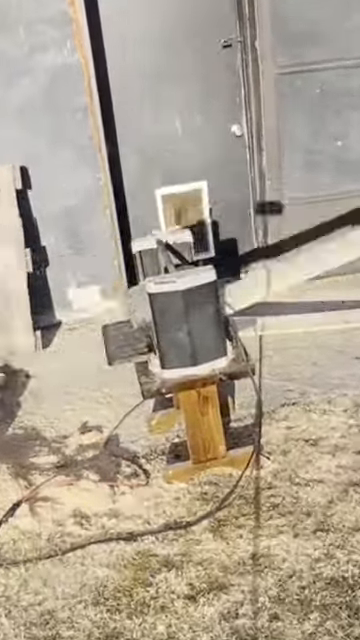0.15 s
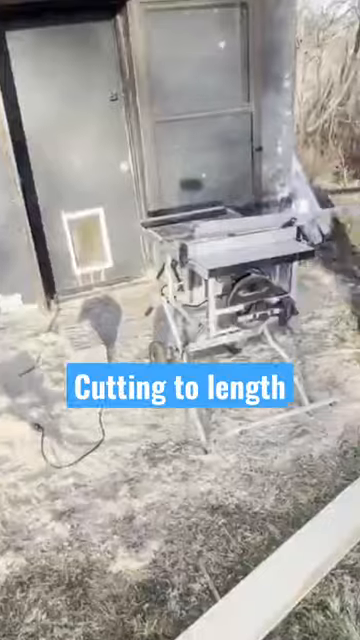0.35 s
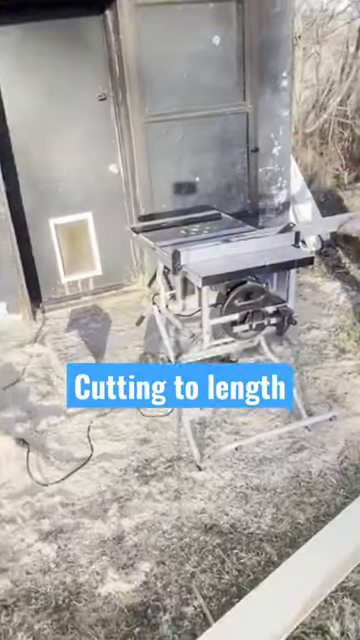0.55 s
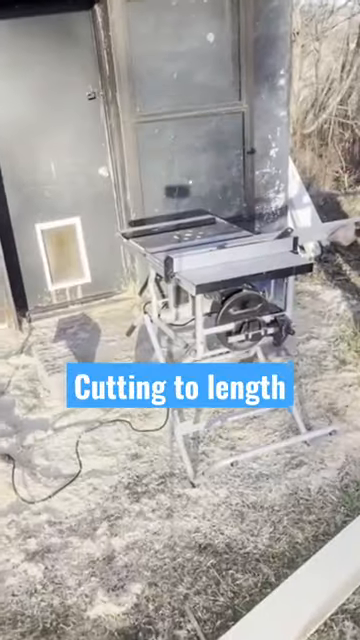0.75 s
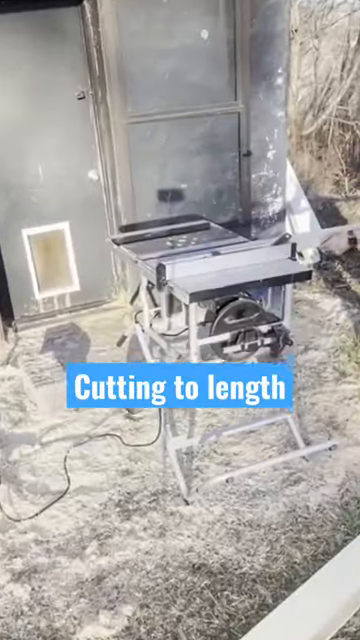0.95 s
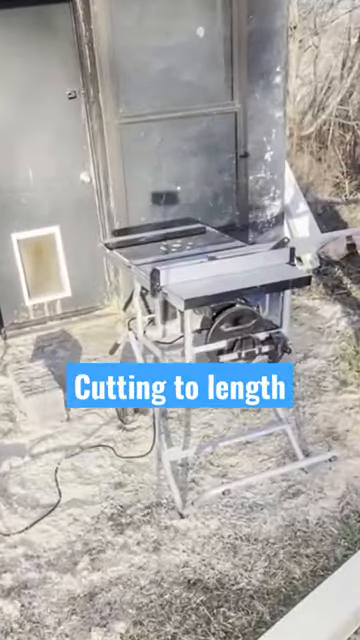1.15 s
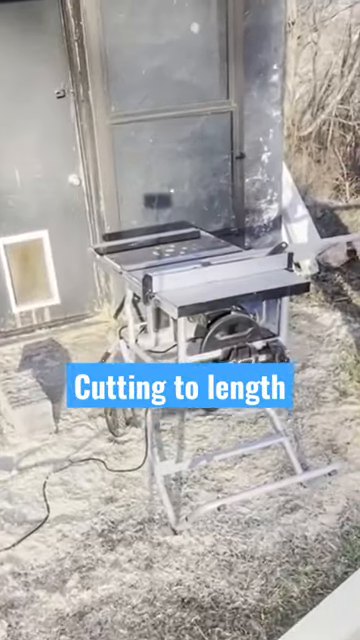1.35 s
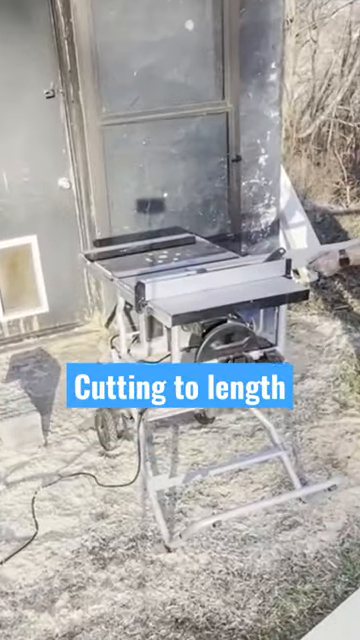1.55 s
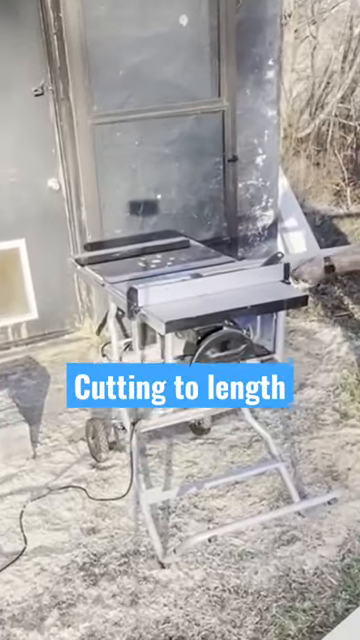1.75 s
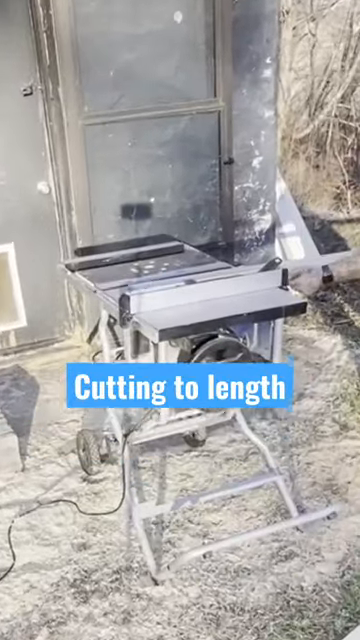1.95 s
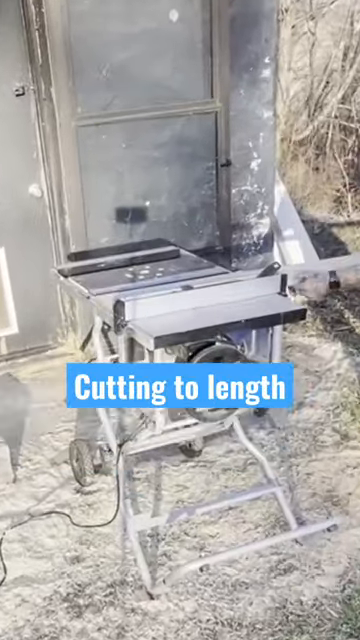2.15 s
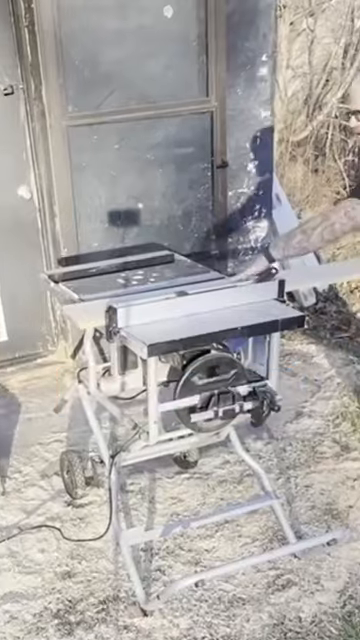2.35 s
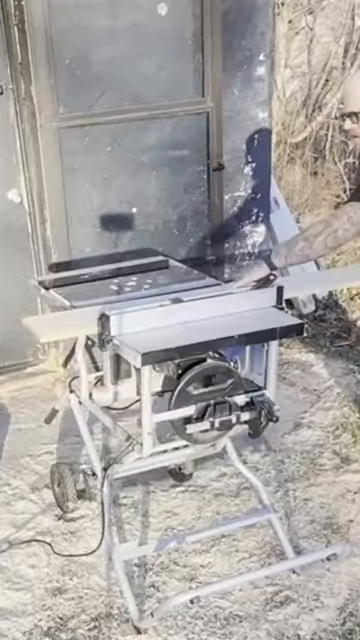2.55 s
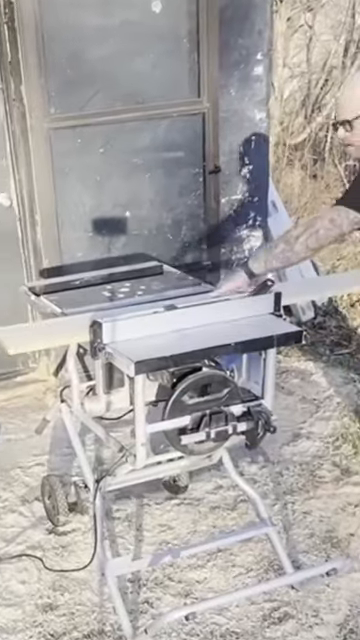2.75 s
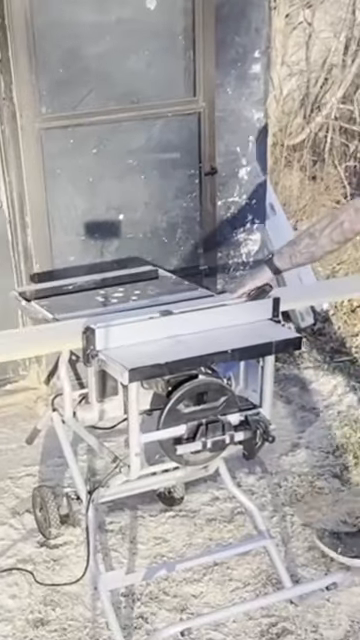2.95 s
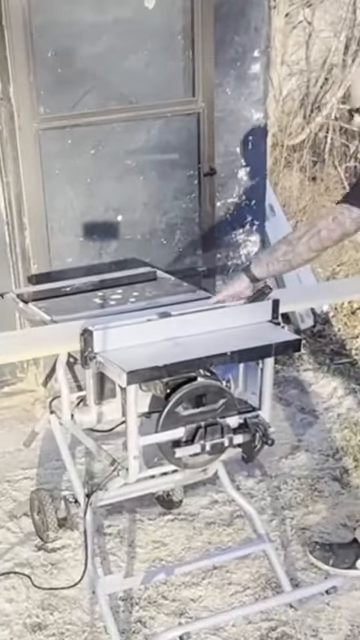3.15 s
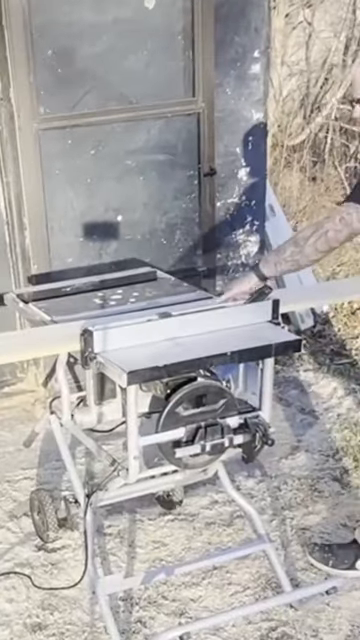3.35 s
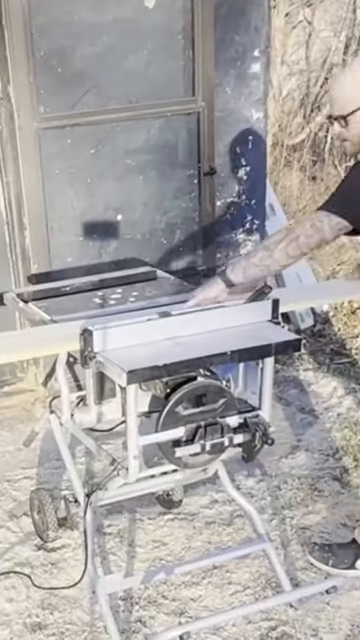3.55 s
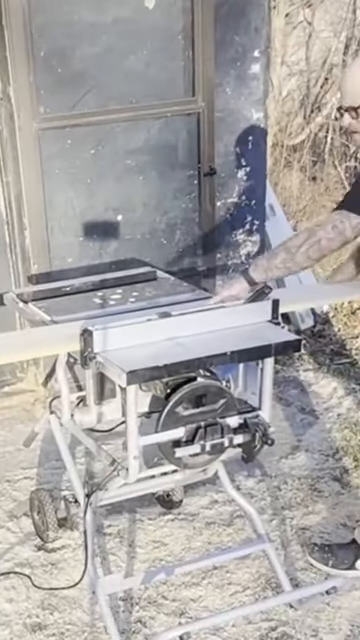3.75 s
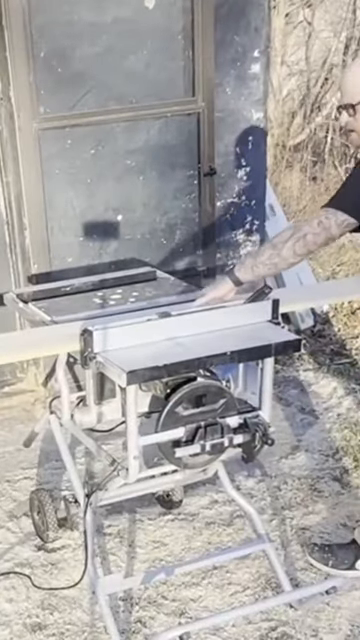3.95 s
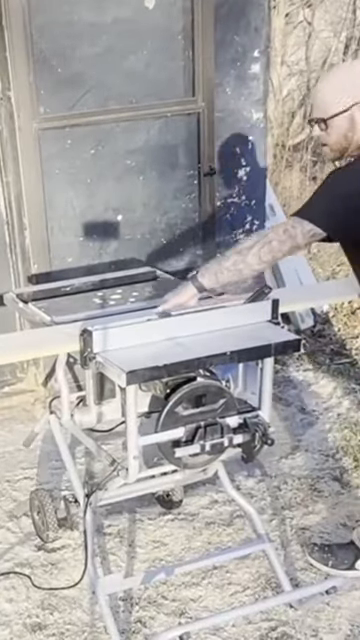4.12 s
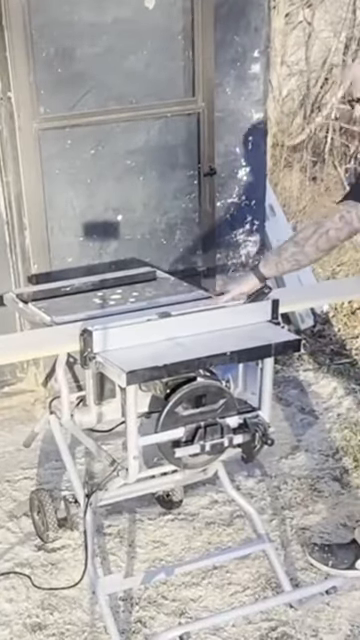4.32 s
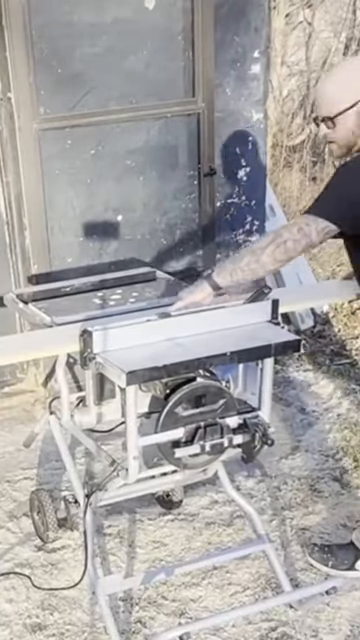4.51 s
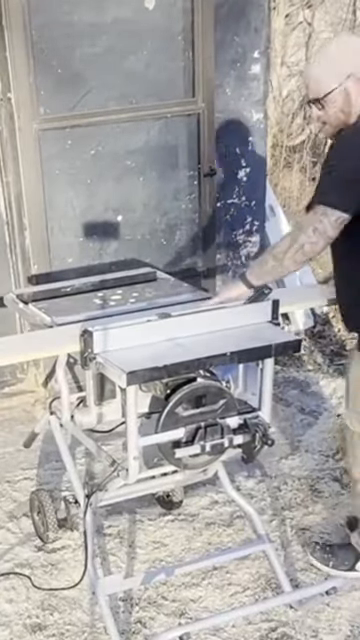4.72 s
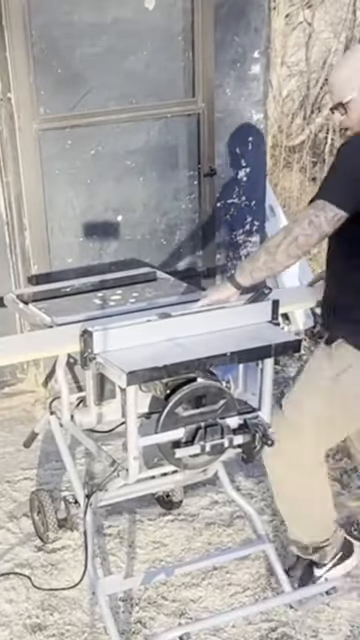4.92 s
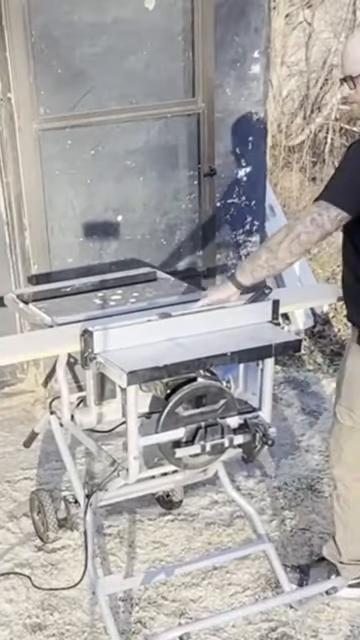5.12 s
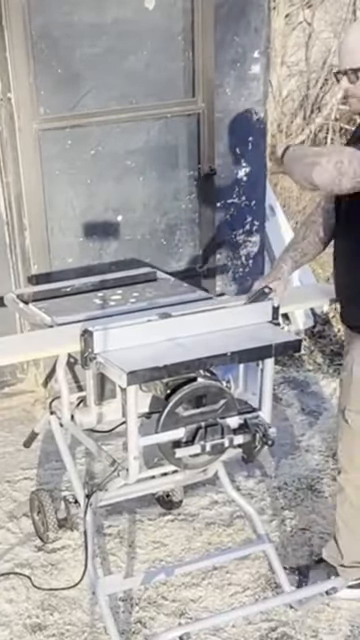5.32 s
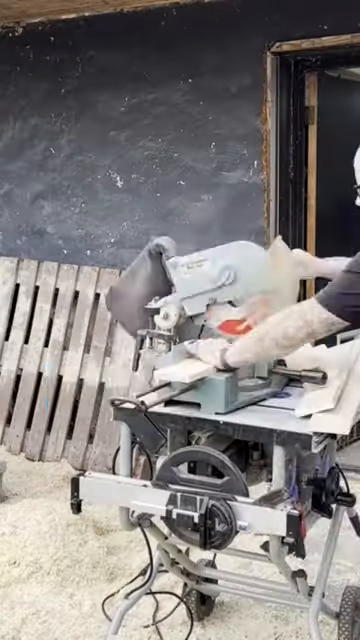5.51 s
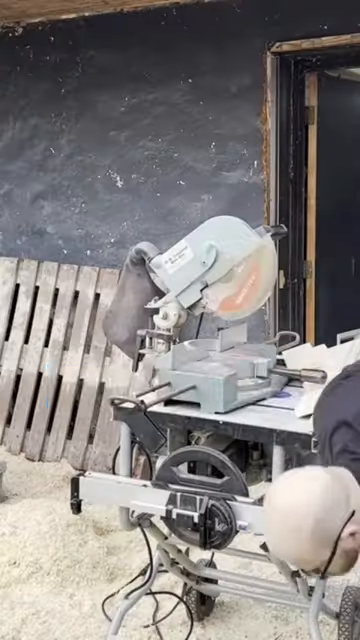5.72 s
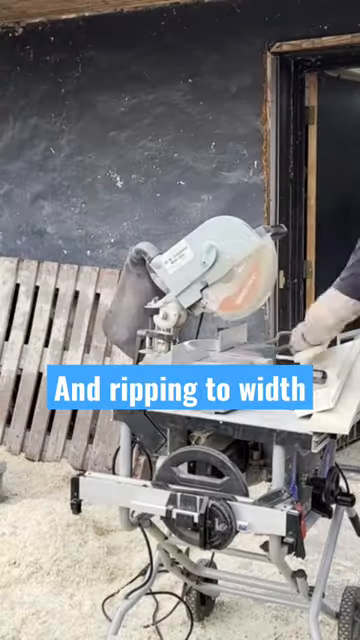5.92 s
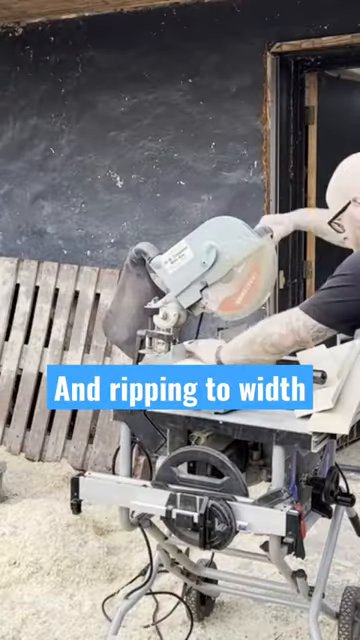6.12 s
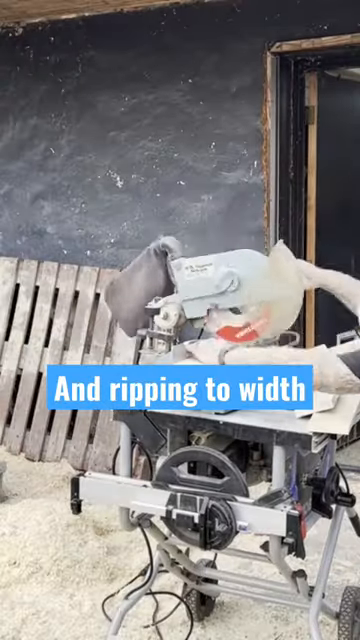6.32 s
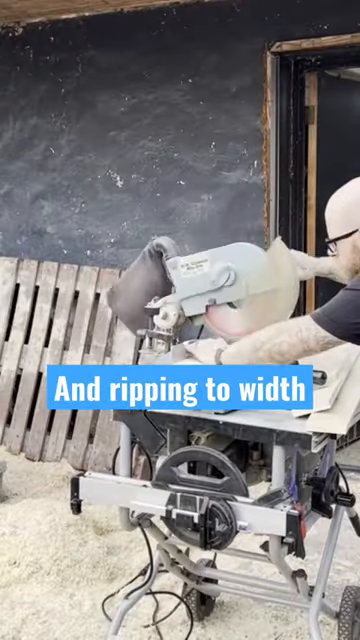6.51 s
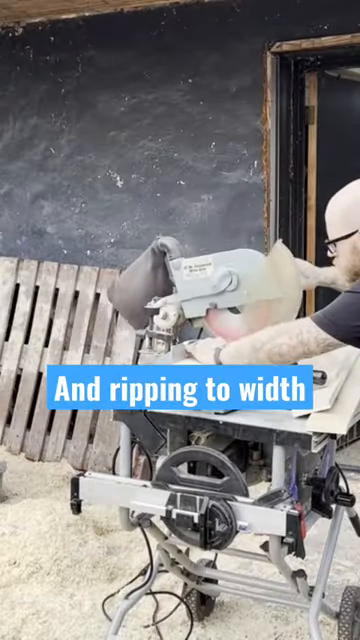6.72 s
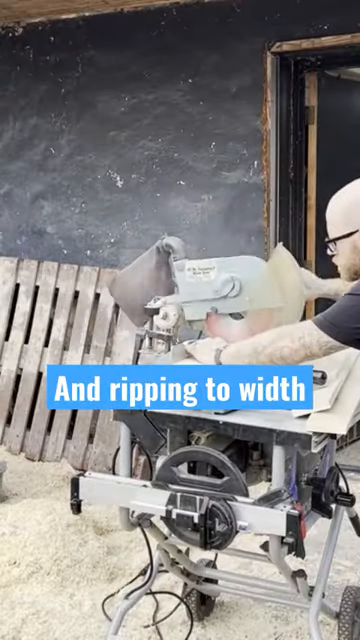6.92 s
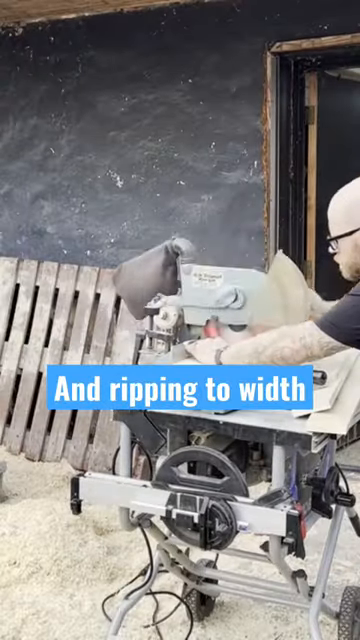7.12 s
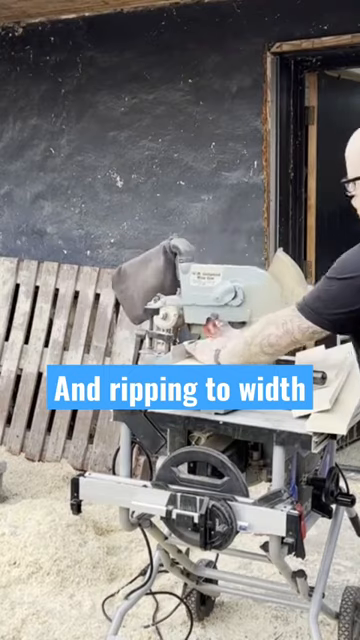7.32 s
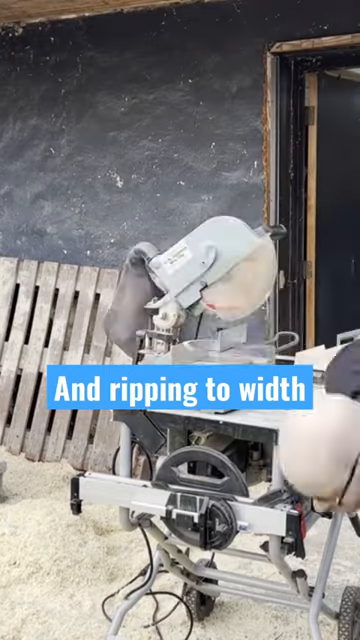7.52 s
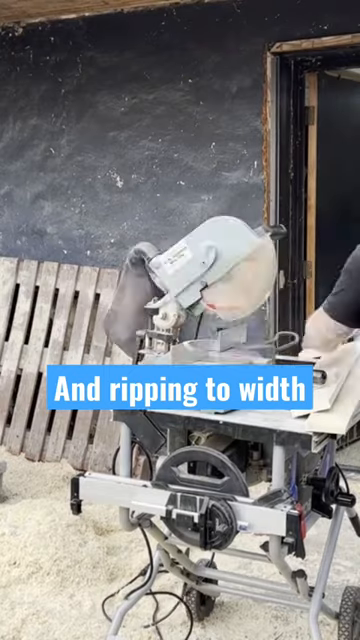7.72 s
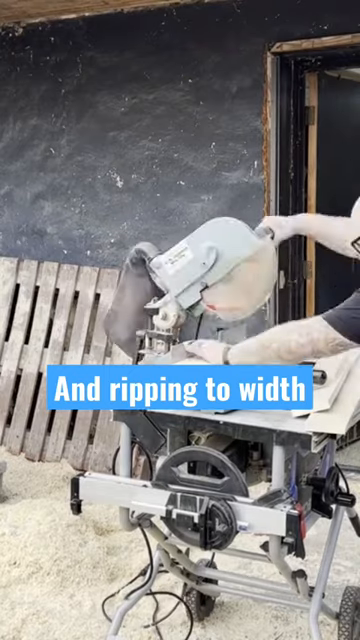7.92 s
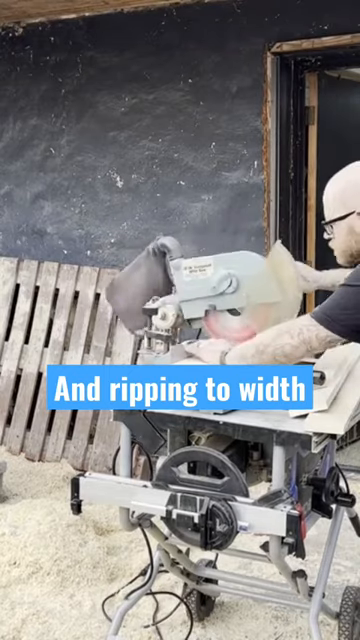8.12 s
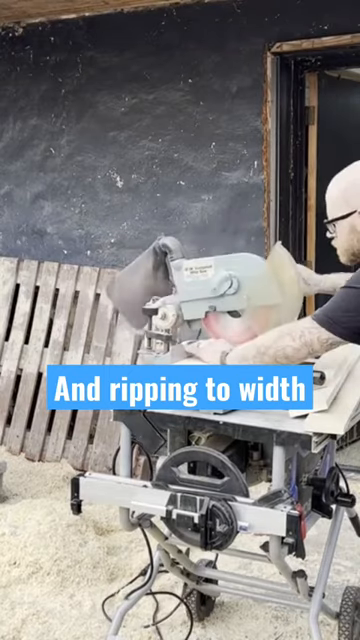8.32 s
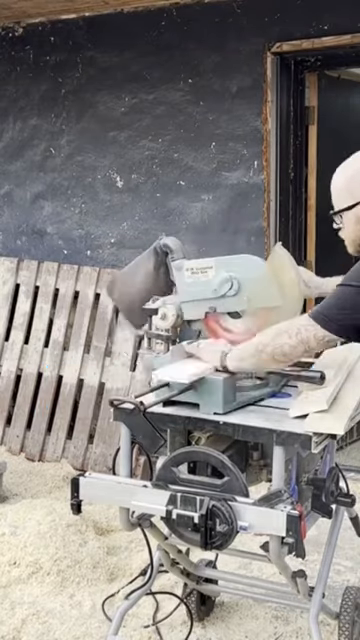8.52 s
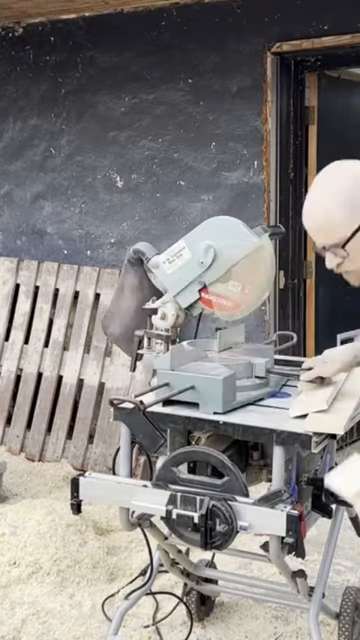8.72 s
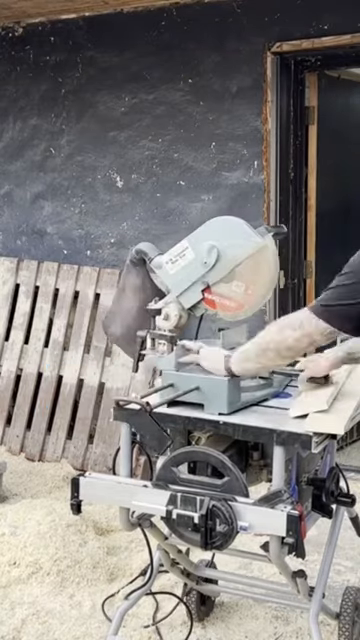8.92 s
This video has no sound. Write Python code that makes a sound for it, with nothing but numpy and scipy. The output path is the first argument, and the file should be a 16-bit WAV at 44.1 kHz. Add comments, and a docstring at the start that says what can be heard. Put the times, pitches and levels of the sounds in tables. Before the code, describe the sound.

A snippet of planer drone cuts to a table saw starting and whining unevenly through a long board, then two short miter saw cuts.

```python
"""Power tools in a windy yard

A planer, a table saw ripping a long board and two miter saw cuts follow abruptly. Motors are tones locked to
pitch curves that sag under load; fan air and cut wood are flickering noise bands; each saw starts with a surge
of harmonics. Wind is lumpy dull noise; knocks are noise bursts ringing board modes; squeaks and small birds
are short gliding tones. Two stereo settings, in the open and near a wall, place the sounds."""
import sys
import numpy as np
from scipy import signal
from scipy.fft import rfft, irfft, next_fast_len
from scipy.io import wavfile
from scipy.ndimage import uniform_filter1d

SR = 44100
rng = np.random.default_rng(int(sys.argv[2]) if len(sys.argv) > 2 else 0)


def int16_out(signal):
    """Quantize to a 16-bit WAV file."""
    q = np.round(np.clip(np.atleast_2d(signal).T, -1, 1) * 32767)
    wavfile.write(sys.argv[1], SR, q.astype(np.int16))


N = 395136

OPEN, WALL = 1, 2   # stereo settings: table columns for the open yard and near the wall
WALL_FROM_S = 5.44   # the table saw's sound ends; wind, gusts and hums switch to the wall setting here


def from_db(db):
    """Amplitude of a level in dB."""
    return 10 ** (np.asarray(db) / 20)


def rms_one(x):
    """Scales to an rms of 1."""
    return x / np.sqrt(np.mean(x ** 2) + 1e-20)


def in_time(rows):
    """First sample of a table's span and its columns, sample by sample."""
    s, *columns = np.transpose(rows)
    start = round(s[0] * SR)
    t = np.arange(start, min(round(s[-1] * SR), N)) / SR
    return start, [np.interp(t, s, c) for c in columns]


def add(out, start, x, fade_s=0.0002):
    """Mixes x in at a sample, with short fades at both ends."""
    n = np.arange(x.shape[-1])
    fade = np.clip(np.minimum(n, n[::-1]) / (fade_s * SR), 0, 1)
    out[:, start:start + len(n)] += (x * fade)[..., :N - start]


def at_hz(points, hz, axis=1):
    """A table column interpolated over log frequency."""
    points = np.array(points)
    return np.interp(np.log(hz), np.log(points[:, 0]), points[:, axis])


def drift(size, rate_hz):
    """Slow chance: random points smoothed by a one-pole low-pass at rate_hz, rms about 1."""
    points_per_s = 100
    points = rng.standard_normal(int(size / SR * points_per_s) + 300)
    r = np.exp(-2 * np.pi * rate_hz / points_per_s)
    slow = rms_one(signal.lfilter([1], [1, -r], points))[250:]
    return np.interp(np.arange(size) / SR * points_per_s, np.arange(len(slow)), slow)


def bumps(start, size, rows, width_s):
    """A bell-shaped bump at each row's time, as high as its value."""
    step = 32
    t = (start + np.arange(0, size + step, step)) / SR
    coarse = sum(height * np.exp(-.5 * ((t - s) / width_s) ** 2) for s, height in rows)
    return np.interp(np.arange(size) / step, np.arange(len(t)), coarse)


TREBLE_HZ, TREBLE_LAG_S = 10000, .000545   # above: one sound on both sides, left late and inverted


def ports(hz, place):
    """Left and right microphone response: level and phase differences split between the sides."""
    # the two microphones: f/Hz, left minus right/dB in the open, near the wall, left lead/rad
    port_rows = [(30, 2, 0, -.5), (70, 2.5, 0, -.3), (345, .5, -1.5, -.2), (700, 0, -1, -.3),
                 (1000, -1, -.5, -.35), (1380, -3, 0, -1.5), (1900, -3, -2.5, -.65), (2400, -1, 1, -.1),
                 (3100, -1, -.5, .6), (3800, -2, -1.5, 1.1), (4500, -2, -1, .8), (6000, 0, -1, .7),
                 (7400, -1, -2.5, 1.1), (8500, -14, -5, .8), (9600, -6, -2, 1.5), (10500, 0, 0, 0)]
    treble_lead = np.pi - 2 * np.pi * hz * TREBLE_LAG_S
    lead = np.where(hz < TREBLE_HZ, at_hz(port_rows, hz, axis=3), treble_lead)
    left = from_db(at_hz(port_rows, hz, axis=place) / 2) * np.exp(.5j * lead)
    return np.array([left, 1 / left])


def air(size, spectrum, patchy_db, place, hiss_db=None, split_hz=3000):
    """Turbulence: stereo noise in flickering half-octave bands, rms 1 below the split, hiss_db above if given."""
    # likeness of left and right: f/Hz, share in the open, share near the wall
    likeness = [(100, .03, .95), (345, .5, .92), (520, .45, .88), (700, .15, .83), (860, .12, .68),
                (1380, .45, .6), (1900, .6, .68), (2400, .6, .68), (3100, .05, .62), (4000, .28, .66),
                (5200, .05, .22), (6500, .12, .35), (8400, .22, .5), (9500, .12, .6)]
    pad = next_fast_len(size)
    hz = np.maximum(np.arange(pad // 2 + 1) * SR / pad, 1)
    shared, own = rfft(rng.standard_normal((2, pad)))
    alike = np.where(hz < TREBLE_HZ, np.clip(at_hz(likeness, hz, axis=place), 0, 1), 1)
    pair = np.sqrt(1 + alike) * shared + np.sqrt(1 - alike) * own * [[1], [-1]]
    pair = pair * ports(hz, place) * from_db(at_hz(spectrum, hz))
    low, high, together = 0, 0, drift(size, 6.7)
    for centre_hz in 23 * 2 ** np.arange(0, 10, .5):
        window = np.cos(np.pi * np.clip(np.log2(hz / centre_hz), -.5, .5)) ** 2
        flicker = from_db(patchy_db * (.5 * together + drift(size, 36)))
        band = irfft(pair * window, pad)[:, :size] * flicker
        if centre_hz < split_hz:
            low = low + band
        else:
            high = high + band
    if hiss_db is not None:
        return rms_one(low) + from_db(hiss_db) * rms_one(high)
    return (low + high) / np.std(low)


def tone(hz, level_db, waver_db, blur_hz, apart_rad=0, place=WALL):
    """A sine on a pitch curve, pitch and level wavering; apart_rad lets its phase stray between the sides."""
    size = len(hz)
    phase = 2 * np.pi * np.cumsum(hz + blur_hz * drift(size, 30)) / SR + rng.uniform(0, 2 * np.pi)
    phase = phase + apart_rad * np.array([drift(size, 2.0), drift(size, 5.8)])
    level = from_db(level_db + waver_db * drift(size, 40))
    return np.sqrt(2) * np.real(ports(hz, place) * np.exp(1j * phase)) * level


def whistle(length_s, start_hz, end_hz, level_db, breath_hz):
    """One short glide under a smooth swell, blurred by breathy noise."""
    size = round(length_s * SR)
    shake_hz = breath_hz * rms_one(uniform_filter1d(rng.standard_normal(size), size=30))
    glide_hz = np.geomspace(start_hz, end_hz, size)
    return tone(glide_hz + shake_hz, level_db, waver_db=1.5, blur_hz=0) * np.hanning(size)


def add_whistles(out, rows):
    """Mixes in one whistle per row."""
    for s, *how in rows:
        add(out, round(s * SR), whistle(*how))


def motor(rows, orders, flicker_db, place, apart_rad, faint=(), rough=0, breakup_db=0):
    """Slot, fan and shaft tones locked to motor speed, which the rotor's inertia smooths; load roughens them."""
    line_rise_s = 0.1   # faint lines fade by 30 dB over this
    start, (hz, *lines_db) = in_time(rows)
    size = len(hz)
    hz = uniform_filter1d(hz, size=900, mode="nearest")
    t = (start + np.arange(size)) / SR
    sag_hz = np.maximum.accumulate(hz) - hz
    hz = hz + rough * sag_hz * rms_one(uniform_filter1d(rng.standard_normal(size), size=130))
    load = sag_hz / sag_hz.max()
    lines = [*zip(orders, lines_db)]
    for k, db, from_s, to_s in faint:
        outside = np.clip(np.maximum(from_s - t, t - to_s) / line_rise_s, 0, 1)
        lines.append((k, db - 30 * outside))
    total = 0
    for k, db in lines:
        level_db = db + flicker_db * drift(size, 6.4) + breakup_db * load * drift(size, 15)
        total = total + tone(k * hz, level_db, flicker_db, 11.0 * k, apart_rad, place)
    return start, total


def streaked(x, depth_db):
    """Random gains on short-time spectrum cells: noise in thin streaks of pitch, about a tenth of a second each."""
    cells = signal.stft(x, nperseg=1024)[2]
    field = rms_one(uniform_filter1d(rng.standard_normal(cells.shape[1:]), size=7))
    broken = signal.istft(cells * from_db(depth_db * field), nperseg=1024)[1][:, :x.shape[1]]
    return broken * np.std(x) / np.std(broken)


def cut_roar(rows, spectrum, place, patchy_db, streak_db, changes=((0, 0),), split_hz=3000):
    """Fan roar and the hiss of the cut; changes briefly raise or lower the roar."""
    change_s, wander_db = 0.016, 0.18
    start, (roar_db, hiss_db) = in_time(rows)
    size = len(roar_db)
    roar_db = roar_db + bumps(start, size, changes, change_s) + wander_db * drift(size, 4.6)
    noise = air(size, spectrum, patchy_db, place, hiss_db, split_hz)
    return start, from_db(roar_db) * streaked(noise, streak_db)


def planer(out):
    """Knives strike at a steady rate; the motor whines above them as it regains speed."""
    # t/s, knife pitch/Hz, knife tone/dB, octave/dB, motor whine/Hz, whine/dB, roar/dB
    planer_rows = [(0.0, 379, -41, -40, 3520, -62, -45), (0.03, 379, -39, -44, 3560, -63, -46),
                   (0.066, 381, -37, -52, 3620, -57, -47), (0.096, 382, -49, -55, 3635, -62, -47),
                   (0.116, 383, -38.5, -51, 3632, -56, -46), (0.14, 384, -37.5, -45, 3638, -56, -46),
                   (0.166, 385, -36.5, -47, 3642, -53, -45), (0.19, 385, -37.5, -49, 3610, -60, -43)]
    # lines following the knife tone: multiple of knife pitch, level/dB re knife tone
    knife_orders = [(.5, -13), (1, -1.5), (4, -23)]
    # lines following the octave: multiple of knife pitch, level/dB re octave
    upper_orders = [(2, 1), (3, -14), (5, -18)]
    # air spectrum: f/Hz, relative density/dB
    air_spectrum = [(59, -53), (100, -29), (288, -24), (388, -16), (672, -14), (763, -2), (866, -19),
                    (7350, -31), (15700, -44)]
    right_lag_s = .00075   # knife tone reaches the right side later
    start, (hz, tone_db, octave_db, whine_hz, whine_db, roar_db) = in_time(planer_rows)
    left, right = sum(tone(k * hz, tone_db + db, waver_db=1.5, blur_hz=4.0) for k, db in knife_orders)
    knives = np.array([left, np.roll(right, round(right_lag_s * SR))])
    upper = [(k * hz, octave_db + db) for k, db in upper_orders]
    upper += [(whine_hz, whine_db), (2 * whine_hz, whine_db)]
    tones = knives + sum(tone(f, db, waver_db=1.5, blur_hz=4.0) for f, db in upper)
    roar = from_db(roar_db) * air(len(hz), air_spectrum, patchy_db=2.5, place=OPEN)
    add(out, start, tones + roar)


def wind(out):
    """Gusts buffet the ports in lumps; near the wall both ports feel much the same gust."""
    # mean strength: t/s, level/dB
    strength = [(0.0, -55.5), (0.4, -56.5), (0.7, -53), (1.4, -57.5), (2.0, -55.5), (2.45, -60), (2.6, -60),
                (3.2, -57.5), (3.5, -57), (4.25, -59.5), (4.5, -61.5), (5.4, -68.5), (5.9, -67.5),
                (6.2, -60), (7.05, -63.5), (7.3, -72), (7.75, -71.5), (8.0, -62), (8.5, -75), (8.96, -69.5)]
    # spectrum in the open: f/Hz, relative density/dB
    open_spectrum = [(20, -18), (45, -4), (70, 3), (150, -3), (300, -11.5), (600, -41), (1200, -69),
                     (2400, -120)]
    # duller spectrum by the wall: f/Hz, relative density/dB
    lee_spectrum = [(20, -16.5), (45, -5), (70, 1), (150, -8.5), (300, -17.5), (600, -37.5), (1200, -85.5),
                    (2400, -120)]
    lumps_db = 3
    start, (level_db,) = in_time(strength)
    size, half = len(level_db), round(WALL_FROM_S * SR)
    level = from_db(level_db + lumps_db * drift(size, 12.0))
    in_open = air(half, open_spectrum, patchy_db=4.0, place=OPEN)
    by_wall = air(size - half, lee_spectrum, patchy_db=4.0, place=WALL) * from_db([[-1.2], [1.2]])
    add(out, start, level * np.hstack([in_open, by_wall]))


def yard(out):
    """Flickering noise in the gaps between the tools, rising steeply into each switch-on."""
    # one table a gap: t/s, level/dB, hiss above it/dB
    gaps = [
        [(.19, -52.5, -1), (.236, -55.5, -7), (.24, -70.5, -5), (.252, -60, -8), (.262, -38, -9)],
        [(5.44, -66.5, -14), (5.55, -76.5, -21), (5.9, -77.5, -27), (6.15, -73.5, -24), (6.44, -77, -27),
         (6.46, -33.5, -6)],
        [(7.25, -75, -6.5), (7.5, -79, -28), (7.8, -75, -24.5), (8.1, -74.5, -27.5), (8.11, -46, 4)],
        [(8.62, -65, -29), (8.75, -86, -21), (8.96, -77, -23)],
    ]
    # spectrum: f/Hz, relative density/dB
    yard_spectrum = [(120, -14.5), (250, -2), (500, 1), (1000, -0.5), (2000, -16), (3200, -27),
                     (8000, -37.5), (11000, -45.5), (15700, -55.5)]
    for rows in gaps:
        start, (level_db, hiss_db) = in_time(rows)
        noise = air(len(level_db), yard_spectrum, patchy_db=3.0, place=OPEN, hiss_db=hiss_db)
        add(out, start, from_db(level_db) * noise)


def gust(s, level_db, top_hz, left_db, alike):
    """One buffet: a short lump of dull noise on the ports."""
    width_s = 0.013
    t = np.arange(-3 * width_s, 3 * width_s, 1 / SR)
    settle = 4000
    shared, *own = rng.standard_normal((3, len(t) + settle))
    noise = alike * shared + (1 - alike) * np.array(own)
    band = signal.butter(2, [35, top_hz], "band", fs=SR, output="sos")
    dull = signal.sosfilt(band, noise)[:, settle:]
    lump = [rms_one(side) for side in dull * np.exp(-.5 * (t / width_s) ** 2)]
    side_db = np.array([[left_db / 2], [-left_db / 2]])
    return round((s + t[0]) * SR), from_db(level_db + side_db - 5) * lump


def gusts(out):
    """The strongest buffets, more alike on both sides near the wall."""
    # t/s, level/dB before a 5 dB cut, dull above f/Hz, left minus right/dB
    buffets = [(0.201, -51, 200, -2), (0.461, -47.5, 250, -0.5), (0.599, -45.5, 120.1, -1.5),
               (0.761, -44.5, 402, 1), (.915, -47, 450, 0), (1.119, -44.5, 120, 4.5),
               (1.151, -47, 350, 5.5), (1.218, -47.5, 250, 7), (1.326, -39, 400, -2), (1.56, -40, 424, 2),
               (1.831, -47.5, 200, -0.5), (1.94, -48, 150, 12), (2.16, -46.5, 297.5, 13),
               (2.27, -46, 250, 2.5), (2.36, -40.5, 350, -0.5), (2.42, -44.5, 150, 8.5),
               (2.75, -53.5, 250, 19), (3.47, -48, 150, -5), (4.27, -52.5, 149.7, 3), (5.48, -56, 120, 4),
               (6.14, -50, 100, 4), (6.39, -60, 120, 4), (6.66, -53, 100, 3), (6.991, -49.5, 99.3, 0),
               (7.26, -68, 100.4, 0), (7.98, -51.5, 99.7, 2)]
    for s, *how in buffets:
        add(out, *gust(s, *how, alike=.2 if s < WALL_FROM_S else .8))


def surge(length_s, level_db, housing):
    """The standing rotor is jolted twice a mains cycle: harmonics, strongest where the housing rattles."""
    buzz_hz = 118.4
    t = np.arange(round(1.2 * length_s * SR)) / SR
    buzz = 0
    for hz in buzz_hz * np.arange(2, 36):
        buzz = buzz + tone(np.full(len(t), hz), at_hz(housing, hz), waver_db=2.0, blur_hz=7.7, apart_rad=0.29)
    swell = np.interp(t / length_s, [0, .12, .45, .85, 1.1, 1.5], [0.1, 0.38, 0.75, 0.55, 0.4, 0.05])
    return from_db(level_db) * rms_one(buzz) * swell


def surges(out):
    """Current surge at each saw's switch-on."""
    # t/s, nominal length/s, level before the swell/dB, saw
    switch_ons = [(0.263, 0.021, -28, "table"), (6.455, 0.029, -25.5, "miter"),
                  (8.105, 0.038, -26.5, "miter")]
    # rattled table saw housing: f/Hz, relative level/dB
    table_housing = [(240, -30), (360, 5), (480, 6), (720, 2), (850, 5), (1370, -20), (1900, -14),
                     (2640, -49), (3900, -12)]
    # rattled miter saw housing: f/Hz, relative level/dB
    miter_housing = [(240, -6.5), (360, -5), (600, -8), (720, 0), (960, 6), (1140, -29), (1310, -2),
                     (1670, -10.5), (2550, -14), (4000, -26)]
    for s, length_s, level_db, saw in switch_ons:
        housing = table_housing if saw == "table" else miter_housing
        add(out, round(s * SR), surge(length_s, level_db, housing))


def table_saw(out):
    """The motor spins up, then each push of the board drags it down; fan roar and cut hiss on top."""
    # t/s, whine/Hz, whine/dB
    motor_rows = [(0.27, 4300, -56), (.3, 5300, -55), (0.33, 6000, -56), (.38, 6554, -57),
                  (0.44, 6950, -49.5), (0.6, 7230, -49.5), (0.76, 7234, -39.5), (1.03, 7290, -53.5),
                  (1.2, 7116, -41.5), (1.4, 6940, -76.5), (1.55, 6700, -47), (1.7, 6540, -44.5),
                  (1.86, 6470, -44.5), (1.95, 6100, -54), (2.04, 5980, -54), (2.08, 6070, -53),
                  (2.15, 6040, -56), (2.3, 6380, -60), (2.37, 6220, -46.5), (2.415, 6080, -44.5),
                  (2.485, 5990, -46.5), (2.53, 6420, -53), (2.61, 7100, -59), (2.7, 6500, -53.5),
                  (2.83, 5980, -54), (2.93, 6850, -48), (3.02, 6400, -56), (3.12, 6110, -54),
                  (3.2, 6190, -53), (3.25, 6030, -45.5), (3.3, 6530, -41), (3.38, 6420, -62),
                  (3.46, 6050, -54.5), (3.55, 6000, -51.5), (3.63, 6620, -48.5), (3.71, 6260, -61.5),
                  (3.8, 6030, -54), (3.86, 6560, -52), (3.94, 7100, -50), (4.04, 6220, -50),
                  (4.15, 5660, -64), (4.21, 6530, -45), (4.245, 6820, -53), (4.34, 6080, -55),
                  (4.43, 5910, -51), (4.54, 5630, -62), (4.63, 6080, -49), (4.69, 6380, -49.5),
                  (4.73, 6710, -41.5), (4.77, 6540, -44), (4.84, 6310, -48), (4.92, 6870, -45.5),
                  (4.96, 6240, -49), (5.0, 6020, -61)]
    # slot whine: multiple of the whine
    slot_orders = [1]
    # fan, gears and blade teeth on the same shaft: multiple of the whine, level/dB, from/s, to/s
    faint_lines = [(.263, -56, .4, 1.15), (.263, -62, 1.15, 5), (.474, -61, 1.25, 1.8), (1.265, -67, .4, 5),
                   (1.27, -54, 1.5, 1.75), (1.476, -65, .4, 5), (.205, -57, 1.44, 1.54),
                   (.361, -62, 1.0, 5), (.361, -53, 1.72, 1.9), (.722, -64, 1.2, 5), (.73, -58, 1.45, 1.66),
                   (1.084, -66, 1.2, 5), (1.44, -58.5, 1.45, 5)]
    # air and cut: t/s, roar/dB, hiss above roar/dB
    roar_rows = [(0.26, -53, -4), (0.27, -43, -3), (0.3, -42, -8), (0.33, -42, 2), (0.8, -44.5, 4.5),
                 (1.86, -45, 4), (2.25, -46.5, 4.5), (2.8, -45.5, 4), (4.93, -44.5, 2.5), (5.11, -51, 0.5),
                 (5.44, -55.5, -1.5)]
    # air spectrum: f/Hz, relative density/dB
    air_spectrum = [(90, -50), (160, -14), (280, -10), (410, -4), (610, -9.5), (850, -4), (1350, -13),
                    (2300, -6.5), (3150, -9), (3550, -12.5), (3900, -9), (4400, -7), (5400, -8), (6450, -6),
                    (7100, -10), (7800, -13), (8200, -9), (8470, -6), (8850, -6.5), (9300, -9),
                    (10000, -14), (11000, -15), (12000, -17), (13700, -20), (15600, -25)]
    # brief changes of the roar: t/s, change/dB
    roar_changes = [(.76, -1), (1.21, 3), (1.79, 2.5), (2.45, 3), (3.0, 3), (3.23, 5.5), (3.45, 2),
                    (3.97, 0.5), (4.13, 1.5), (4.88, 1)]
    # rough: pitch shake as a share of the sag
    whine = motor(motor_rows, slot_orders, flicker_db=1.7, place=OPEN, apart_rad=.4, faint=faint_lines,
                  rough=.03, breakup_db=1.5)
    add(out, *whine, fade_s=.02)
    roar = cut_roar(roar_rows, air_spectrum, place=OPEN, patchy_db=0.8, streak_db=4.0, changes=roar_changes)
    add(out, *roar, fade_s=0.0038)


def hum(start_s, end_s, hz, wander_hz, level_db):
    """A frame resonance that wanders in pitch and level; its phase strays less between sides by the wall."""
    flicker_db = 3.5
    size = round((end_s - start_s) * SR)
    apart_rad, place = (1.2, OPEN) if start_s < WALL_FROM_S else (.4, WALL)
    pitch_hz = hz + wander_hz * drift(size, 5)
    level_db = level_db + flicker_db * drift(size, 5)
    return round(start_s * SR), tone(pitch_hz, level_db, 3.0, 4.0, apart_rad, place)


def hums(out):
    """The saws' frames hum unsteadily while wood is cut."""
    # start/s, end/s, f/Hz, wander/Hz, level/dB
    hum_rows = [(1.3, 5.05, 850, 14, -56), (1.3, 5.0, 915, 16, -59), (1.3, 5.0, 1020, 20, -62),
                (1.3, 5.0, 700, 10, -63), (2.2, 5.0, 2350, 40, -63), (3.0, 5.0, 4300, 60, -63),
                (3.1, 4.3, 360, 15, -62), (3.1, 5.05, 440, 25, -61), (3.9, 5.2, 237, 3, -62),
                (6.5, 7.12, 615, 12, -56), (6.52, 7.15, 1300, 8, -58), (8.14, 8.5, 620, 12, -53)]
    for row in hum_rows:
        add(out, *hum(*row), fade_s=0.044)


def smear(length_s, start_hz, end_hz, level_db, width_hz):
    """A glide spread by slow noise into a band of the given width."""
    size = round(length_s * SR)
    low_pass = signal.butter(2, width_hz / 2, fs=SR, output="sos")
    noise = signal.sosfilt(low_pass, rng.standard_normal(size + SR))[SR:]
    return whistle(length_s, start_hz, end_hz, level_db, 0) * rms_one(noise)


def run_downs(out):
    """Air bands falling as a motor runs down."""
    # t/s, length/s, start f/Hz, end f/Hz, level/dB, width/Hz
    falls = [(5.03, .34, 3900, 1500, -58, 600), (7.12, .1, 1800, 550, -53, 300),
             (8.44, .1, 3000, 1700, -58, 700)]
    for s, *how in falls:
        add(out, round(s * SR), smear(*how))


def rings(out):
    """Faint rings of the idle blade and one low moan, as near-steady tones."""
    # t/s, length/s, start f/Hz, end f/Hz, level/dB, breathiness/Hz
    ring_rows = [(5.17, .25, 5350, 5250, -67, 40), (5.44, .12, 2180, 2180, -80, 30),
                 (5.44, .1, 3100, 3100, -88, 30), (5.91, .2, 150, 140, -63, 10),
                 (8.6, .26, 2150, 2150, -89, 30)]
    add_whistles(out, ring_rows)


def chirps(out):
    """Small birds: short high glides."""
    # t/s, length/s, start f/Hz, end f/Hz, level/dB, breathiness/Hz
    chirp_rows = [(5.49, .03, 7340, 7360, -85, 202), (5.905, .03, 7730, 7550, -89.5, 250),
                  (5.99, 0.01, 8470, 7770, -93, 100), (6.245, .035, 7520, 7400, -90, 250),
                  (7.405, 0.021, 7500, 7500, -93, 250), (7.64, 0.033, 7350, 7400, -77, 200),
                  (7.806, 0.017, 9500, 7240, -80, 59.7), (8.06, 0.033, 7900, 7900, -84, 248)]
    add_whistles(out, chirp_rows)


def squeaks(out):
    """Short squeaks: brief breathy glides."""
    # t/s, length/s, start f/Hz, end f/Hz, level/dB, breathiness/Hz
    squeak_rows = [(5.538, 0.046, 2330, 2300, -72, 60), (5.547, .03, 4600, 4650, -84, 60),
                   (6.499, 0.039, 2510, 2630, -39, 60), (6.509, 0.085, 2480, 3920, -46, 70),
                   (7.352, 0.032, 4280, 4300, -65, 30), (7.355, 0.041, 2320, 2310, -65.5, 150),
                   (8.406, .04, 2930, 2990, -41.5, 150)]
    add_whistles(out, squeak_rows)


def knock(peak_db, contact_s, ring_db, dull_hz):
    """A ragged contact of some milliseconds cracks and sets the board's modes ringing briefly."""
    # board modes: f/Hz, relative level/dB, t60/s
    board_modes = [(1110, 3, .014), (2000, 0, .01), (2670, -12, .008), (3550, -10, .01), (6020, -18, .008)]
    t = np.arange(round(.08 * SR)) / SR
    swell = np.interp(t / contact_s, [0, .3, .7, 1.2], [0.024, 0.96, 0.81, 0.022])
    noise = rng.standard_normal((2, len(t))) * swell
    contact = noise[0] + 0.41 * noise
    hit = contact
    for hz, db, t60_s in board_modes:
        r, w = from_db(-60 / (t60_s * SR)), 2 * np.pi * hz / SR
        ring = signal.lfilter([0, np.sin(w)], [1, -2 * r * np.cos(w), r * r], contact)
        hit = hit + from_db(db + ring_db - 12.5) * ring
    band = signal.butter(3, [300, min(dull_hz, 15000)], "band", fs=SR, output="sos")
    hit = signal.sosfilt(band, hit)
    return from_db(peak_db) * hit / np.abs(hit).max()


def knocks(out):
    """Wood handled on the saw."""
    # t/s, peak/dB, nominal contact/s, ring against crack/dB before a 12.5 dB cut, dull above f/Hz
    knock_rows = [(5.605, -77, .03, -16, 5000), (5.71, -74, 0.023, -23, 3000),
                  (5.735, -81, 0.023, -21, 6040), (6.023, -41, 0.013, 20, 2210),
                  (6.034, -45, 0.0085, 1, 4960), (6.082, -48, 0.0081, -11, 4400),
                  (6.12, -76, 0.025, -20, 4000), (6.185, -70, 0.028, -19, 3000),
                  (6.23, -70, 0.004, -7, 3000), (6.433, -51, 0.004, -42, 890),
                  (7.363, -69, 0.026, -15, 6890), (7.796, -77, .03, -16, 3500),
                  (7.838, -74, 0.019, -22, 8000), (7.845, -59, 0.027, -27, 1470),
                  (7.849, -69, 0.026, -16, 6000), (8.784, -52, 0.028, -16.5, 7580),
                  (8.888, -83, .02, -21, 6000), (8.936, -72, 0.02, -16, 4000)]
    for s, *how in knock_rows:
        add(out, round(s * SR), knock(*how), fade_s=.0005)


def miter_cut(on_s, off_s, roar_db, fall_db_per_s, hiss_db):
    """Kick, cut that grows hissier, then a braked run-down: rows of t/s, roar/dB, hiss above roar/dB."""
    kick_db, kick_peak_s, kick_end_s = 7.5, 0.017, 0.059   # roar overshoots at switch-on
    exit_db, exit_s = 1, 0.046   # roar swells as the blade leaves the wood
    hiss_start_db, hiss_idle_db, hiss_stopped_db = -10, -2.5, -18.5   # re loaded hiss
    stop_s = 50 / fall_db_per_s
    return [(on_s, roar_db, hiss_db + hiss_start_db),
            (on_s + kick_peak_s, roar_db + kick_db, hiss_db + hiss_start_db / 2),
            (on_s + kick_end_s, roar_db, hiss_db + hiss_idle_db),
            (off_s - exit_s, roar_db, hiss_db),
            (off_s, roar_db + exit_db, hiss_db - exit_db),
            (off_s + stop_s, roar_db - fall_db_per_s * stop_s, hiss_db + hiss_stopped_db)]


def miter_saw(out):
    """Two cuts: slot whine and shaft tone follow the motor speed under fan roar and cut hiss."""
    # one table a cut: t/s, whine/Hz, whine/dB, shaft tone/dB
    motor_tables = [
        [(6.545, 3800, -38.5, -46), (6.627, 4290, -42, -53), (6.68, 4414, -47.5, -50),
         (6.783, 4470, -41.5, -49.5), (6.86, 4390, -48.5, -50.5), (6.951, 4264, -39, -67.5),
         (7.03, 4300, -43, -69), (7.05, 4390, -56.5, -60), (7.105, 4400, -58.5, -61), (7.15, 4470, -78.5, -80)],
        [(8.15, 2920, -60.5, -65), (8.18, 3450, -53.5, -58), (8.212, 4010, -46.5, -52.5),
         (8.28, 4240, -43, -57.5), (8.322, 4170, -42.5, -50.5), (8.41, 3990, -60.5, -57),
         (8.47, 3740, -68.5, -50)],
    ]
    # slot whine, shaft rate: multiple of the whine
    shaft_orders = [1, 1 / 12]
    # switch-on/s, switch-off/s, roar/dB, run-down/(dB/s), hiss above roar under load/dB
    cuts = [(6.454, 7.1, -41.5, 190, -0.5), (8.106, 8.441, -41.5, 148, 1)]
    # air spectrum: f/Hz, relative density/dB
    air_spectrum = [(90, -50), (160, -20), (280, -19), (400, -10), (520, -6), (615, -2.5), (730, -5),
                    (900, -6), (1200, -8), (1600, -13), (2300, -12), (3000, -10), (3600, -13), (4300, -10),
                    (5200, -17), (7400, -20), (8300, -15.5), (9200, -19.5), (10300, -18.5), (12000, -23),
                    (13700, -26), (15600, -30)]
    for speed, cut in zip(motor_tables, cuts):
        add(out, *motor(speed, shaft_orders, flicker_db=1.2, place=WALL, apart_rad=0.52), fade_s=0.028)
        roar = cut_roar(miter_cut(*cut), air_spectrum, place=WALL, patchy_db=1.1, streak_db=4.5, split_hz=2500)
        add(out, *roar, fade_s=0.006)


def teeth(out):
    """Blade teeth sing in the wood: one wavering tone a miter cut."""
    # one table a cut: t/s, f/Hz, level/dB
    tooth_tables = [
        [(6.82, 1900, -65), (6.864, 1870, -52), (6.944, 1830, -56), (7.024, 1810, -55), (7.046, 1850, -60),
         (7.06, 1890, -47), (7.096, 1900, -39), (7.118, 1900, -44), (7.13, 1900, -56)],
        [(8.24, 1830, -58), (8.282, 1820, -51), (8.34, 1770, -47), (8.394, 1700, -42), (8.432, 1640, -45),
         (8.47, 1600, -60)],
    ]
    for rows in tooth_tables:
        start, (hz, level_db) = in_time(rows)
        add(out, start, tone(hz, level_db, waver_db=2.0, blur_hz=4.0, apart_rad=.2), fade_s=0.011)


def scene():
    """All sources mixed in stereo."""
    out = np.zeros((2, N))
    for source in (planer, wind, yard, gusts, surges, table_saw, hums, run_downs, rings, chirps, squeaks,
                   knocks, miter_saw, teeth):
        source(out)
    return out


def record(dry):
    """The top is cut steeply."""
    cutoff_hz = 15680
    return signal.sosfilt(signal.ellip(10, .5, 70, cutoff_hz, fs=SR, output="sos"), dry)


dry = scene()
out = record(dry)
int16_out(out)
```